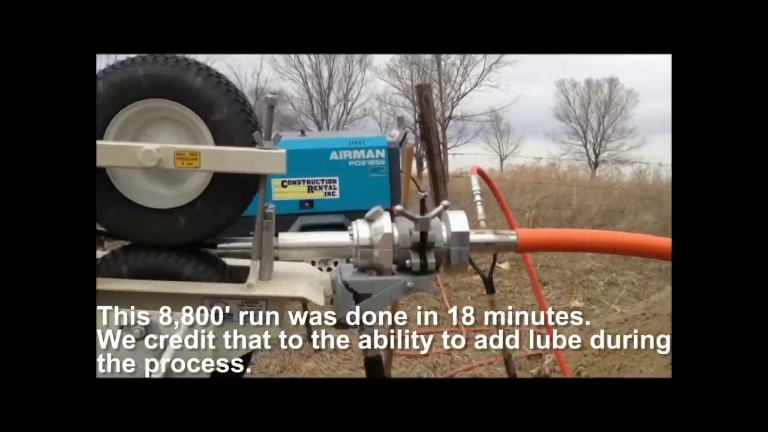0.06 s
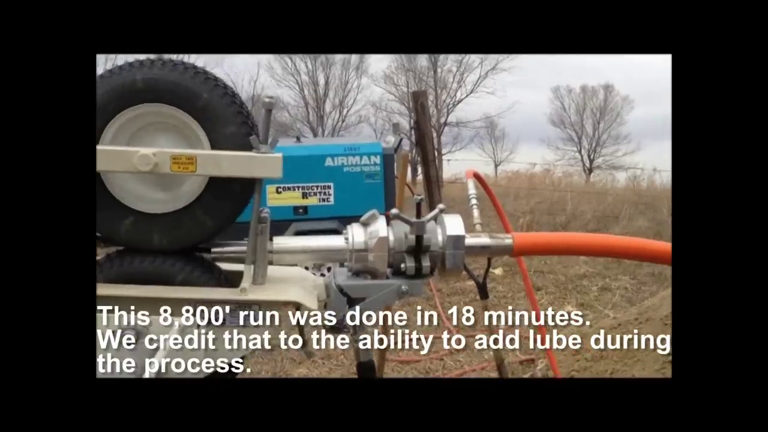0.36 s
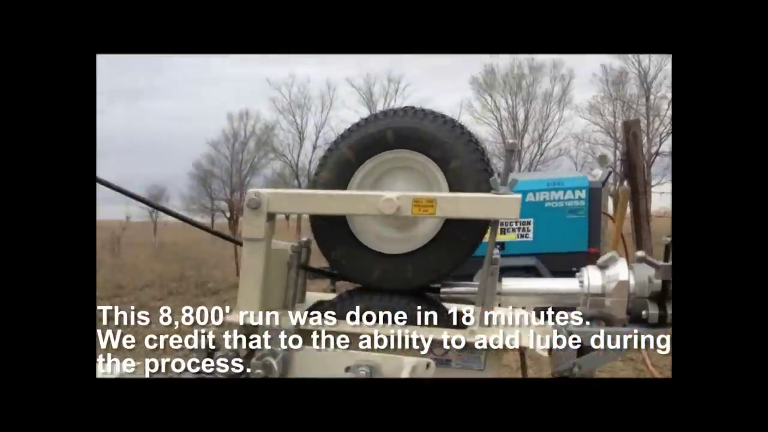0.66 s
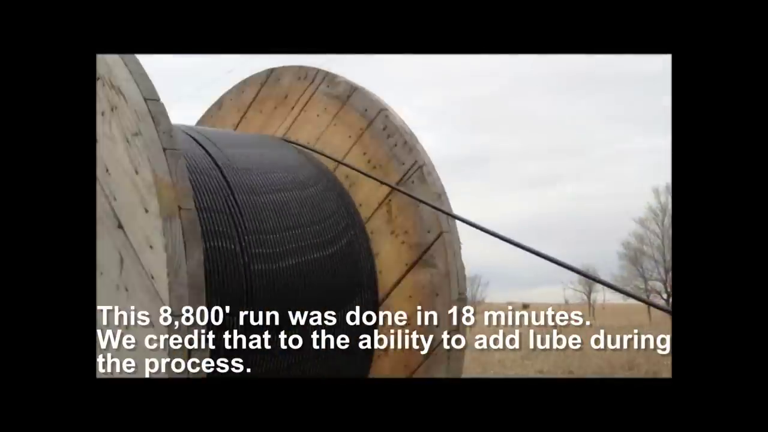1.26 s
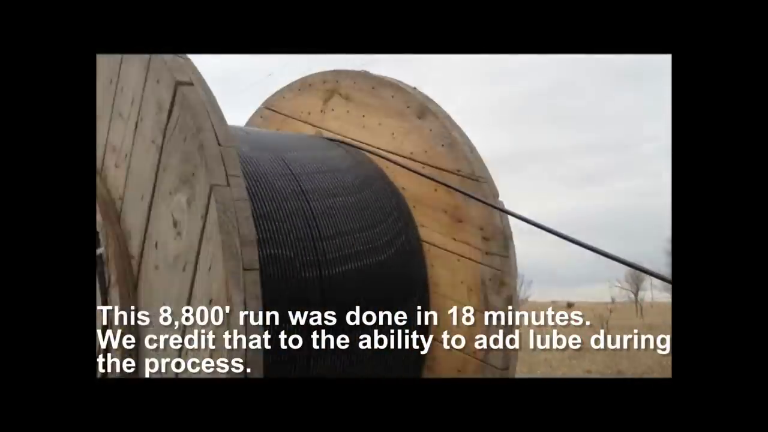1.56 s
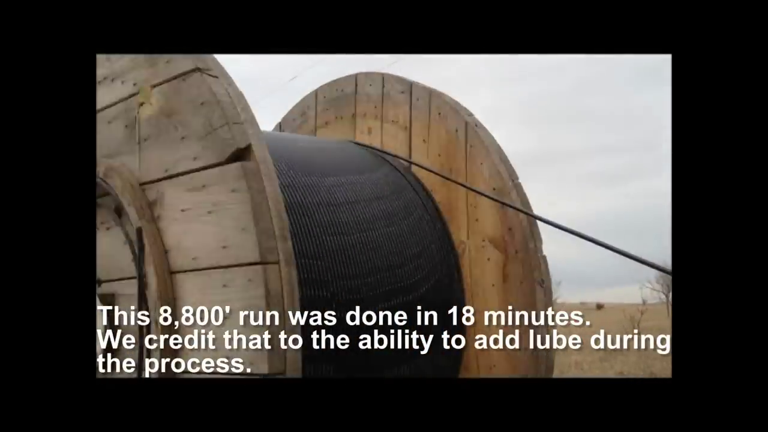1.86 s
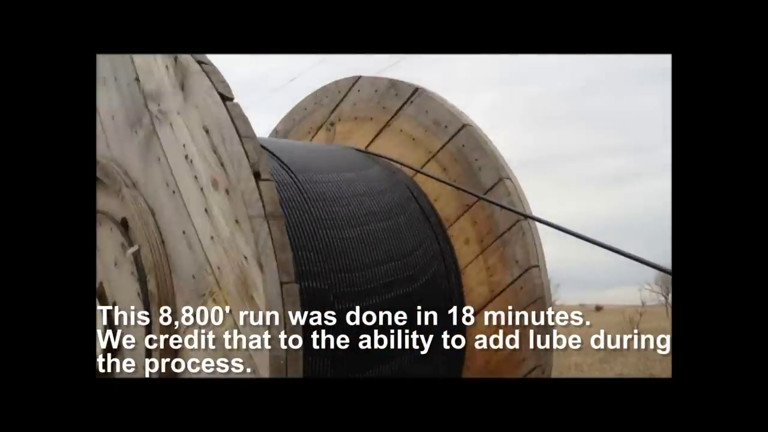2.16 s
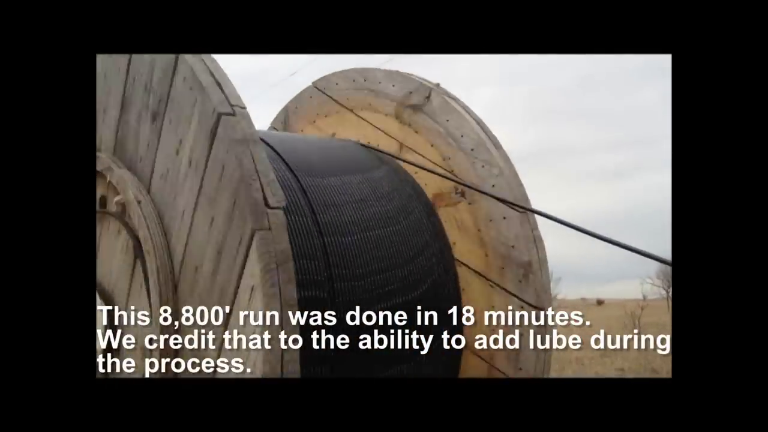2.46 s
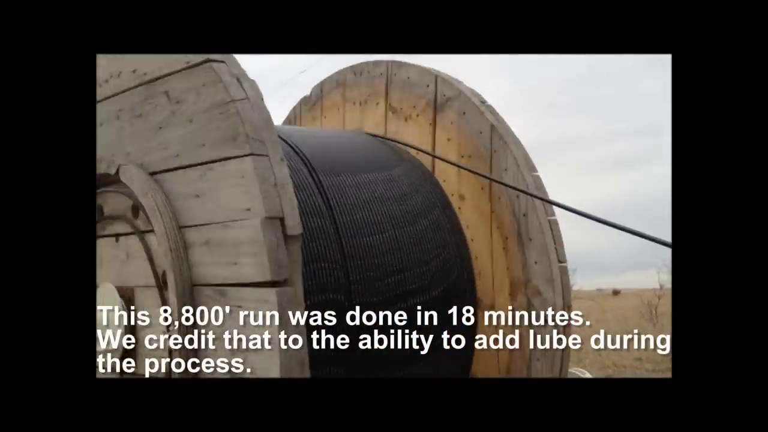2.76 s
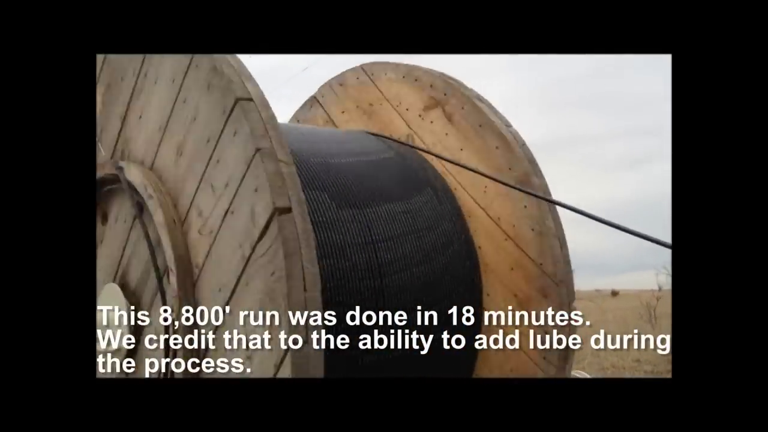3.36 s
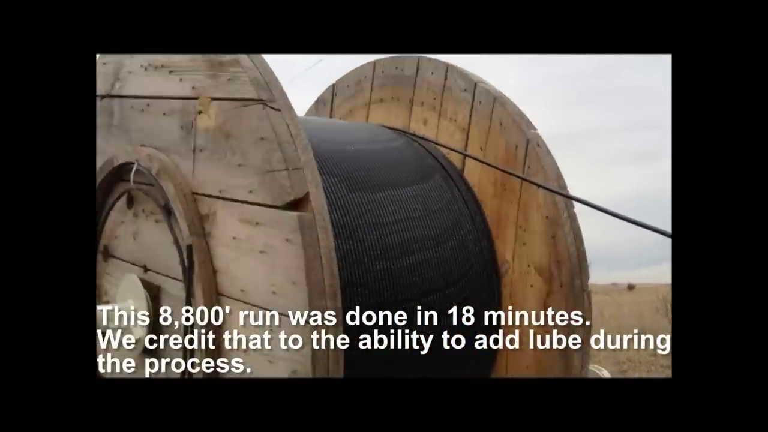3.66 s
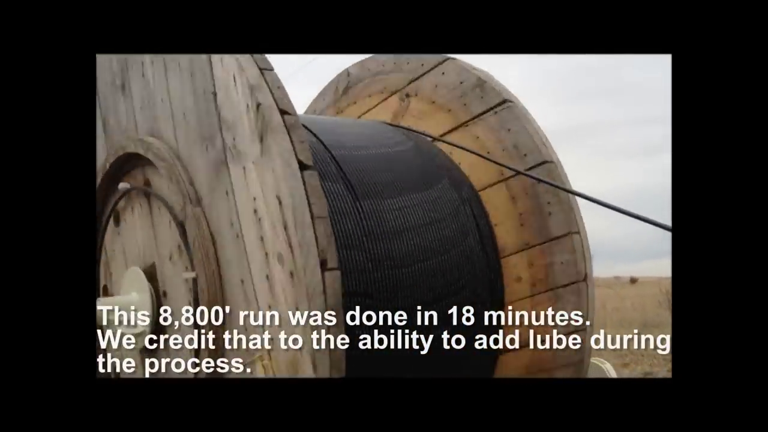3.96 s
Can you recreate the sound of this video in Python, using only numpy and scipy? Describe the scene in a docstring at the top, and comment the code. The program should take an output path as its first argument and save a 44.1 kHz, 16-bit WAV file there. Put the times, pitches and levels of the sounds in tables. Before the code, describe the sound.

An air compressor runs outdoors in an open field, hissing loudly with a high, fluttering whine over a low engine drone. Near the end the hiss drops away with a short rising swish, the drone recedes and the whine remains.

```python
"""A loud rush of air with a narrow, fluttering whine near 5 kHz, over a steady engine drone.
A diesel drives an air compressor in an open field: shaft orders hum and the exhaust throbs,
while the air hisses and rings fixed resonances in the housing. Near 3 s the broad hiss drops
away with a rising swish, the drone recedes and the whine stands clearer."""
import sys
import numpy as np
from scipy import signal
from scipy.fft import rfft, irfft, next_fast_len
from scipy.io import wavfile
from scipy.ndimage import uniform_filter1d, map_coordinates

SR = 44100
rng = np.random.default_rng(int(sys.argv[2]) if len(sys.argv) > 2 else 0)


def output_pcm(signal):
    """Save a mono or channel-first signal as 16-bit PCM at the path in sys.argv[1].

    Samples are clipped to [-1, 1] before scaling.
    """
    pcm = np.clip(np.atleast_2d(signal).T, -1, 1) * 32767
    wavfile.write(sys.argv[1], SR, np.round(pcm).astype(np.int16))


N = 176400
T = np.arange(N) / SR


def air_hiss():
    """Escaping air: a broad, turbulent hiss that drops away late."""
    # fader (time [s], relative level [dB])
    hiss_fader = [(0.0, -18), (0.03, -21.5), (0.07, -15), (0.33, -20), (0.51, -16.5), (1.1, -15),
                  (1.21, -19.5), (1.29, -16.5), (1.5, -19.5), (1.61, -14), (1.64, -19.5), (2.21, -16.5),
                  (2.22, -19.5), (2.81, -19), (2.83, -22), (2.97, -26.5), (3.97, -30.5), (4.0, -33)]
    # tone colour (frequency [Hz], relative level [dB])
    hiss_eq = [(1500, -36.5), (3000, -11.5), (3600, -6), (3950, -1.5), (4200, -4.5), (4550, 2),
               (4850, -0.5), (5500, -7.5), (6300, -9), (7200, -13), (8300, -20.5), (12000, -38)]
    return amp(curve(hiss_fader) + 2) * rush(hiss_eq, patchy_db=1)


def air_whine():
    """Escaping air sings in one narrow, fluttering band with a noisy skirt around it."""
    # whine fader (time [s], relative level [dB])
    whine_fader = [(0.0, -28), (0.09, -16.5), (0.31, -19.5), (0.39, -14.5), (0.87, -20), (1.09, -17.5),
                   (1.21, -22), (1.26, -16.5), (1.6, -18), (1.64, -12.5), (1.7, -22.5), (1.83, -12.5),
                   (1.88, -25), (1.92, -18), (2.25, -15.5), (2.31, -21.5), (2.49, -15.5), (2.68, -21),
                   (2.88, -17.5), (2.95, -27.5), (3.2, -15.5), (3.22, -21), (3.98, -23), (4.0, -35)]
    # centre of the whine (time [s], frequency [Hz])
    whine_pitch = [(0, 5140), (.25, 5150), (.5, 5100), (.76, 5010), (1.4, 4976), (2.2, 5033), (3.2, 5056),
                   (4, 5016)]
    # skirt fader (time [s], relative level [dB])
    skirt_fader = [(0, -19), (.1, -22.5), (1.05, -21), (1.2, -22), (2.2, -21), (2.8, -23.5), (2.95, -23.5),
                   (3.15, -25.5), (3.9, -24), (4, -29)]
    # skirt colour (frequency [Hz], relative level [dB])
    skirt_eq = [(3000, -32.5), (4300, -11), (4750, -3.5), (5200, -9.5), (5450, 0.5), (5800, -4.5),
                (6600, -16.5), (9000, -45)]
    centre_hz = curve(whine_pitch) + 30 * wobble(25)
    whine = amp(curve(whine_fader) + .5) * resonance(centre_hz, half_width_hz=135)
    skirt = amp(curve(skirt_fader)) * rush(skirt_eq, patchy_db=.8)
    return whine + skirt


def jet_fizz():
    """The finest spray of the air jet: a bright sheen on top."""
    # fader (time [s], relative level [dB])
    fizz_fader = [(0, -23), (.25, -21.2), (.45, -23), (.7, -23), (1.02, -19), (1.15, -22.5), (1.3, -19.5),
                  (1.48, -22.4), (1.7, -23), (1.8, -20), (2.05, -21.5), (2.16, -19), (2.25, -24.5),
                  (2.55, -22), (2.67, -25), (2.9, -25), (3.11, -26.5), (3.22, -29), (3.37, -27.5),
                  (3.45, -29), (3.88, -28), (4, -31.5)]
    # tone colour (frequency [Hz], relative level [dB])
    fizz_eq = [(3000, -25), (6000, -20), (7500, -7), (8700, -5), (9400, 1.5), (10100, -0.5), (11000, 3.5),
               (13000, 3), (15400, -1.5)]
    return amp(curve(fizz_fader) + .5) * rush(fizz_eq, patchy_db=.7)


def casing():
    """Air noise rings the housing in the upper mids; the balance of the rings shifts early and late."""
    # noise fader (time [s], relative level [dB])
    noise_fader = [(0, -23), (.12, -21), (.25, -24), (.45, -22), (.68, -21), (1.05, -21.5), (1.2, -39),
                   (1.32, -22), (1.7, -23.5), (2.3, -24), (2.5, -27), (2.9, -25.5), (3.0, -20.5),
                   (3.15, -21.5), (3.25, -29), (3.38, -23.5), (3.55, -27), (4, -29.5)]
    # noise colour (frequency [Hz], relative level [dB])
    noise_eq = [(700, -34), (1400, -6.5), (1800, -3.5), (2100, 0.5), (2450, 4), (2950, -7.5), (3500, -8),
                (4300, -14.5), (6000, -9)]
    # housing resonances (frequency [Hz], half-width [Hz], level [dB], early trim [dB], late trim [dB])
    modes = [(1818, 150, -35.5, -2, -2.5), (2611, 112, -29.5, -4.5, -3), (3097, 100, -41, 16.5, -4),
             (3257, 115, -28, 0.5, -3.5), (3860, 92, -35.5, -10, -1.5)]
    early = np.interp(T, [.2, .65], [1, 0])
    late = np.interp(T, [2.85, 3.58], [0, 1])
    rings = sum(amp(db + early * early_db + late * late_db) * resonance(hz, half_width_hz)
                for hz, half_width_hz, db, early_db, late_db in modes)
    return amp(curve(noise_fader)) * rush(noise_eq, patchy_db=1.56) + rings


def swish():
    """A band of the hiss glides upward, widens and fades."""
    # path of the band (time [s], centre [Hz], level [dB])
    sweep = [(2.74, 4400, -42), (2.85, 4600, -17), (2.9, 4750, -22), (2.95, 6100, -25), (3.0, 6700, -25),
             (3.08, 7300, -31), (3.2, 7940, -50)]
    times, hz, db = np.transpose(sweep)
    centre_hz = np.interp(T, times, hz)
    narrow = resonance(centre_hz, half_width_hz=260)
    wide = resonance(centre_hz, half_width_hz=800)
    spread = np.interp(centre_hz, [4800, 6000], [0, 1])
    band = np.sqrt(1 - spread) * narrow + np.sqrt(spread) * wide
    return amp(np.interp(T, times, db, left=-120, right=-120)) * band


def shafts():
    """Running counts of engine cycles and compressor rotor turns, drifting in speed together."""
    # engine speed as the pitch of its 14th order (time [s], frequency [Hz])
    order_14_pitch = [(0, 266.5), (.45, 268.3), (.75, 266), (2.3, 265.8), (3.8, 266.3), (4, 267.5)]
    cycle_hz, rotor_hz = curve(order_14_pitch) / 14, 28.93
    drift = 1 + .002 * wobble(5.12)
    return np.cumsum(cycle_hz * drift) / SR, np.cumsum(rotor_hz * drift) / SR


def machine_drone(cycles, turns):
    """Engine and compressor tones over an exhaust rumble that throbs once per engine cycle."""
    # engine tones (order [multiple of the cycle rate], relative level [dB])
    engine_orders = [(3, -32), (5, -23), (6, -13), (8, -4.5), (9, -7.5), (10, -11.5), (11, -8), (13, -4.5),
                     (14, 0.5), (16, -14.5), (18, -11), (19, -15.5), (24, -16.5)]
    # compressor tones (order [multiple of the rotor rate], relative level [dB])
    rotor_orders = [(2, -53), (3, -12.5), (4, -16), (6, -24), (7, -4.5), (12, -17)]
    # exhaust colour (frequency [Hz], relative level [dB])
    exhaust_eq = [(20, -48), (45, -42), (60, -26), (76, -8), (100, -6), (165, 4), (230, 3.5), (300, 0.5),
                  (420, -9.5), (800, -19.5)]
    # fader for all three (time [s], gain [dB])
    drone_fader = [(0, 1), (1.1, 0), (2.0, 0), (2.7, 0), (2.95, -1), (3.2, -5.5), (3.6, -5.5), (4, -9)]
    engine = amp(-39.5) * shaft_tones(cycles, engine_orders)
    compressor = amp(-38.5) * shaft_tones(turns, rotor_orders)
    puffs = throb(cycles, depth=.7) * amp(2.4 * wobble(16))
    exhaust = amp(-38) * unit(rush(exhaust_eq, patchy_db=.5) * puffs)
    return amp(curve(drone_fader)) * (engine + compressor + exhaust)


def machine_roar(cycles):
    """The machine's midrange roar, pulsing faintly with the engine cycle."""
    # fader (time [s], relative level [dB])
    roar_fader = [(0, -30), (.12, -27.5), (.33, -31.5), (.42, -30), (.7, -28.5), (1.08, -29), (1.22, -30.5),
                  (1.31, -27), (1.42, -31.5), (1.58, -29.5), (1.7, -33.5), (1.8, -29.5), (1.95, -31.5),
                  (2.33, -30.5), (2.45, -33), (2.6, -32), (2.75, -32), (3.1, -32.5), (3.27, -37.5),
                  (3.36, -34), (3.46, -37.5), (3.58, -37), (4, -42)]
    # tone colour (frequency [Hz], relative level [dB])
    roar_eq = [(200, -25), (420, -7), (560, -6), (680, -0.5), (850, -2.5), (1050, 2), (1400, -0.5),
               (2200, -6.5), (5000, -40)]
    roar = unit(rush(roar_eq, patchy_db=1.7) * throb(cycles, depth=.064))
    return amp(curve(roar_fader) - .5) * roar


def rush(eq, patchy_db):
    """Coloured noise of rms 1 with turbulent patches in time and frequency."""
    spectrogram = signal.stft(rng.standard_normal(N), nperseg=512)[2]
    patches = uniform_filter1d(rng.standard_normal(spectrogram.shape), 8, axis=0)
    patches = unit(uniform_filter1d(patches, 12, axis=1))
    noise = signal.istft(spectrogram * amp(patchy_db * patches), nperseg=512)[1][:N]
    hz, db = np.transpose(eq)
    return unit(filtered(noise, lambda f: amp(np.interp(np.log(f + 1), np.log(hz), db))))


def resonance(hz, half_width_hz):
    """Turbulence ringing in one resonance, whose centre may move."""
    slow_noise = filtered(rng.standard_normal((2, N)), lambda f: 1 / (1 + (f / half_width_hz) ** 2))
    phase = 2 * np.pi * np.cumsum(hz * np.ones(N)) / SR
    return unit(slow_noise[0] * np.cos(phase) + slow_noise[1] * np.sin(phase))


def shaft_tones(turns, orders):
    """Sines locked to a shaft, each at a random phase."""
    return sum(np.sqrt(2) * amp(db) * np.sin(2 * np.pi * (order * turns + rng.random()))
               for order, db in orders)


def throb(cycles, depth):
    """A swell once per cycle."""
    return 1 + depth * np.cos(2 * np.pi * cycles)


def wobble(rate):
    """A smooth random curve, rate knots a second."""
    return map_coordinates(rng.standard_normal(2000), [T * rate + 2], mode="wrap")


def filtered(x, response):
    """Equalise x with a gain given as a function of frequency."""
    size = next_fast_len(N + 8192)
    return irfft(rfft(x, size) * response(np.fft.rfftfreq(size, 1 / SR)), size)[..., :N]


def curve(rows):
    """One value per sample from (time [s], value) rows."""
    return np.interp(T, *np.transpose(rows))


def amp(db):
    """Decibels to gain."""
    return 10 ** (np.asarray(db) / 20)


def unit(x):
    """Scale to rms 1."""
    return x / np.sqrt(np.mean(x ** 2) + 1e-20)


def scene():
    """Air and machine flutter slightly together on their way to the listener, in centred mono."""
    flutter = amp(.55 * wobble(14) + .25 * wobble(45))
    cycles, turns = shafts()
    machine = machine_drone(cycles, turns) + machine_roar(cycles)
    air = air_hiss() + air_whine() + jet_fizz() + casing() + swish()
    mono = flutter * (air + machine)
    return np.array([mono, mono])


def record(dry):
    """Round off the highest peaks, then cut the deep bass and the very top."""
    ceiling, low_cut_hz, top_hz = .93, 72, 15500
    rounded = dry / (1 + np.abs(dry / ceiling) ** 12) ** (1 / 12)
    return filtered(rounded, lambda hz: (hz < top_hz) * np.sqrt(1 - 1 / (1 + (hz / low_cut_hz) ** 6)))


dry = scene()
out = record(dry)
output_pcm(out)
```